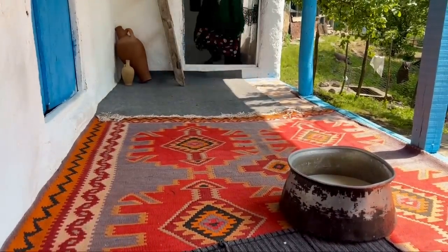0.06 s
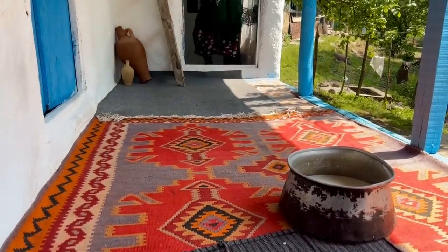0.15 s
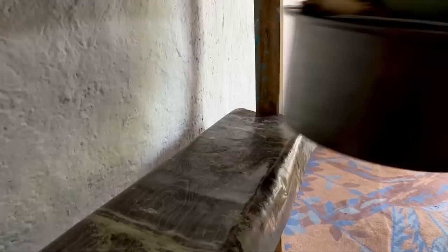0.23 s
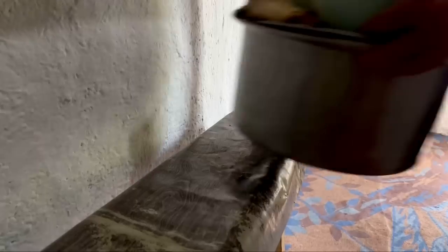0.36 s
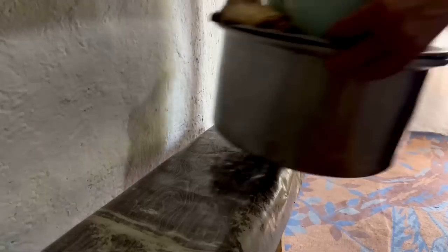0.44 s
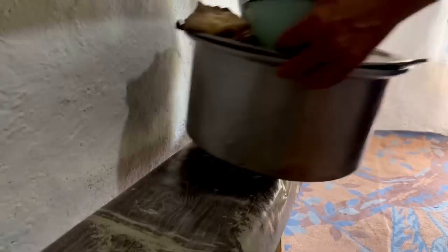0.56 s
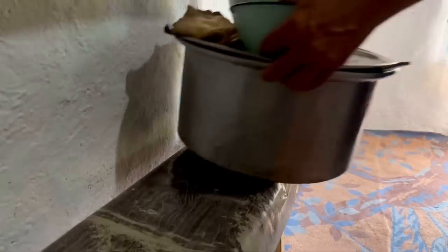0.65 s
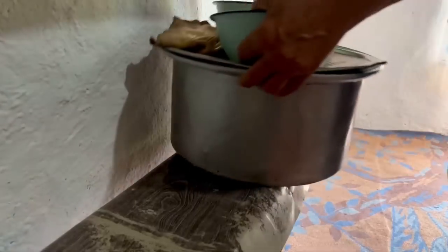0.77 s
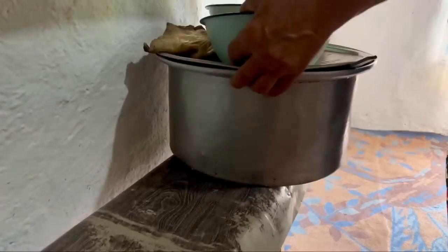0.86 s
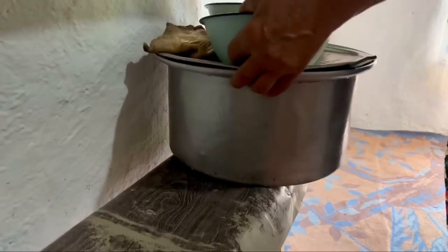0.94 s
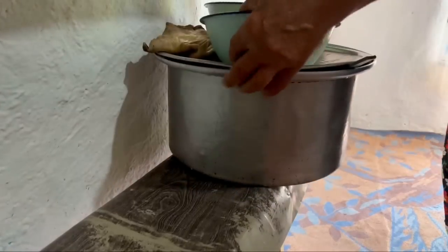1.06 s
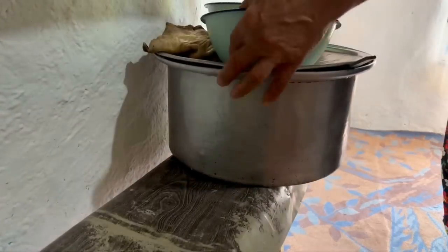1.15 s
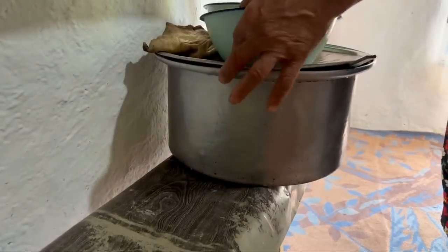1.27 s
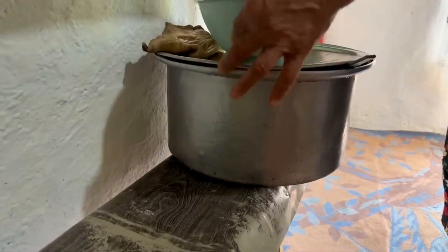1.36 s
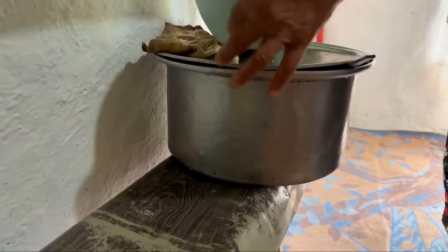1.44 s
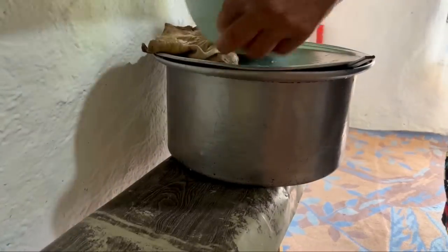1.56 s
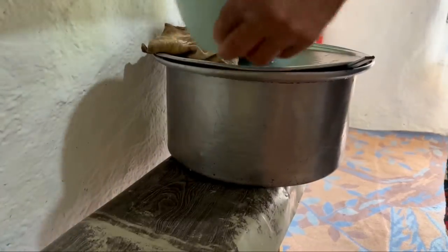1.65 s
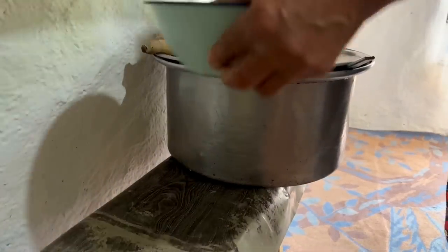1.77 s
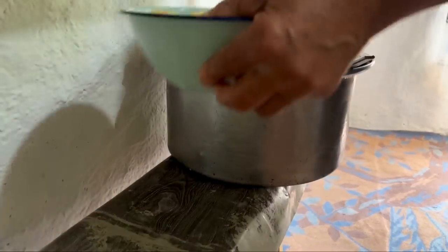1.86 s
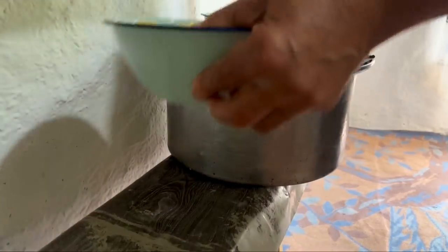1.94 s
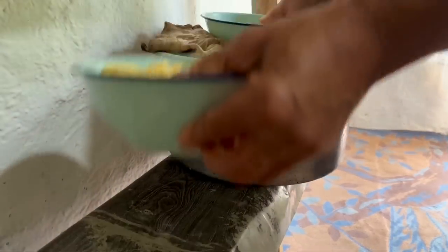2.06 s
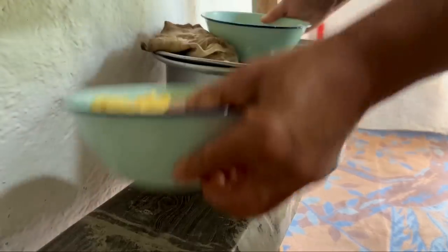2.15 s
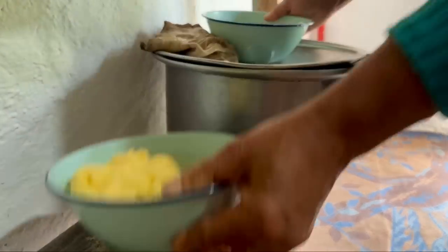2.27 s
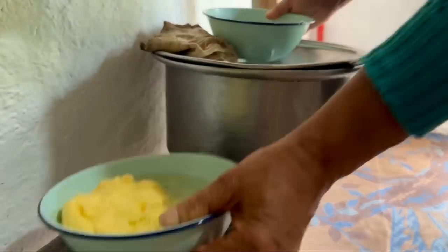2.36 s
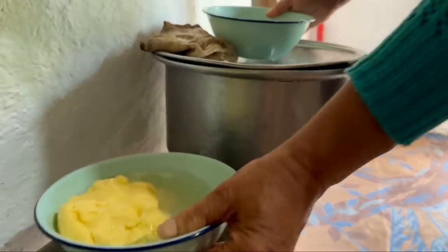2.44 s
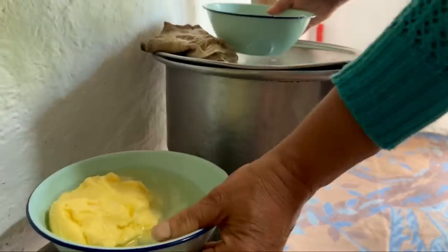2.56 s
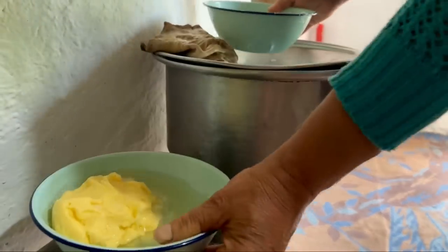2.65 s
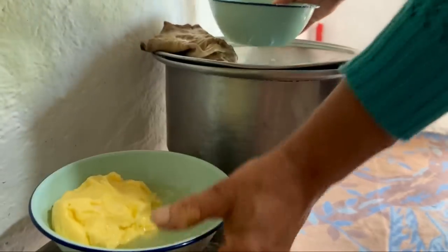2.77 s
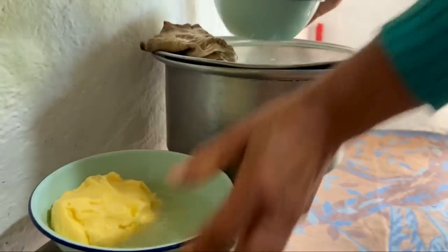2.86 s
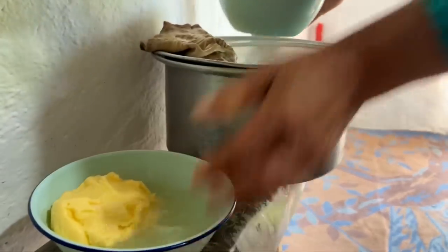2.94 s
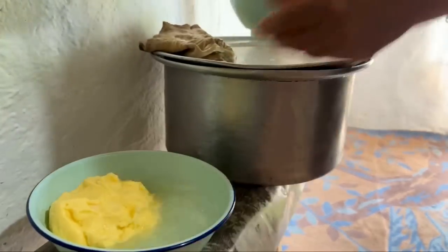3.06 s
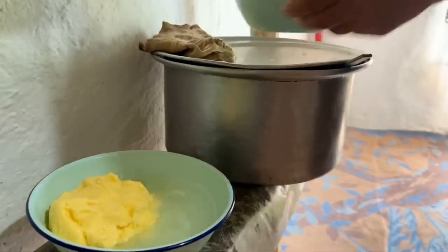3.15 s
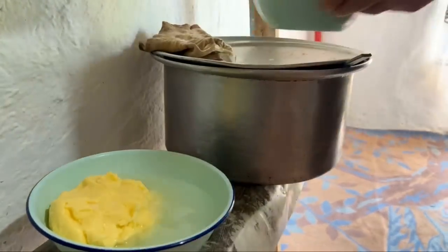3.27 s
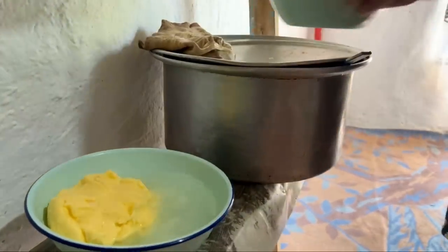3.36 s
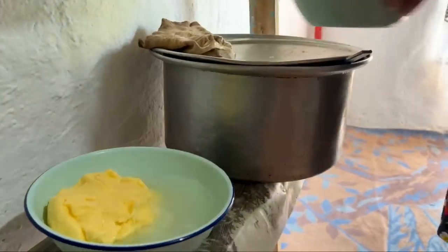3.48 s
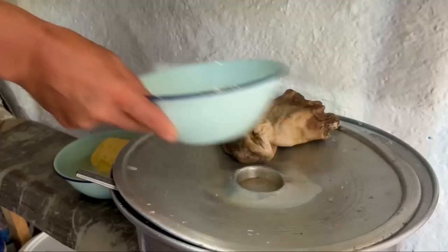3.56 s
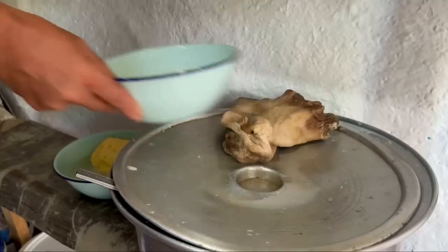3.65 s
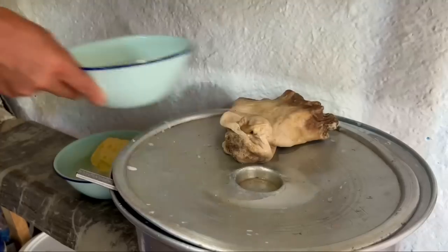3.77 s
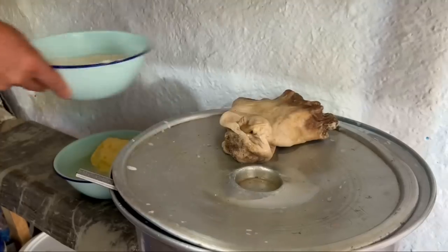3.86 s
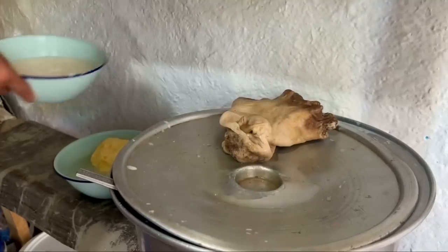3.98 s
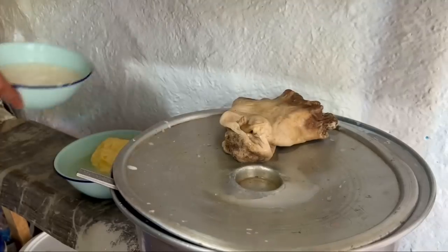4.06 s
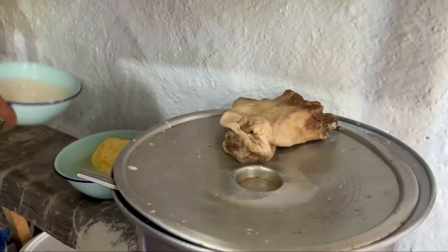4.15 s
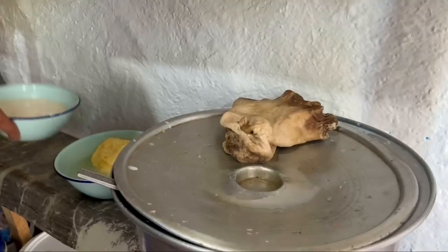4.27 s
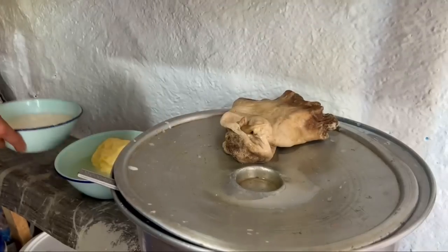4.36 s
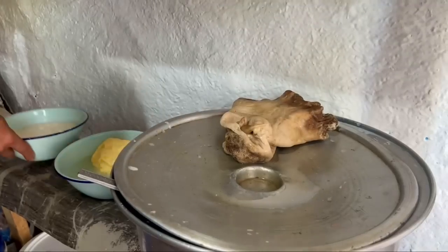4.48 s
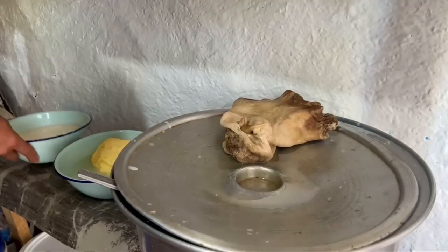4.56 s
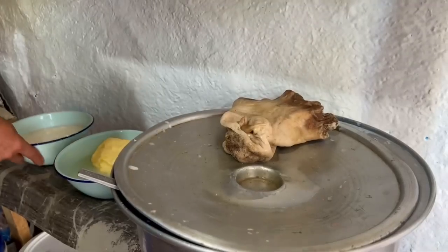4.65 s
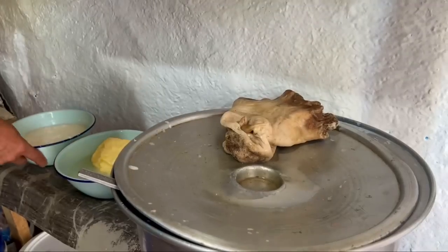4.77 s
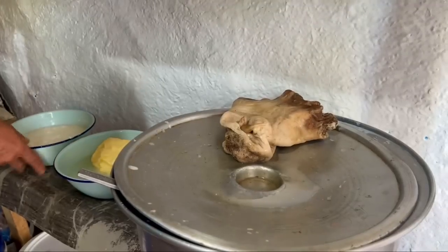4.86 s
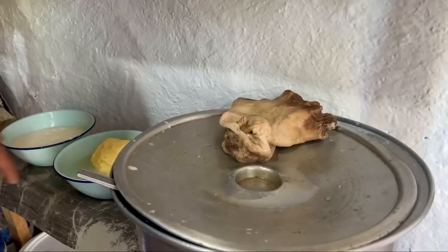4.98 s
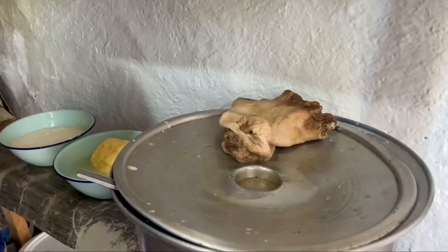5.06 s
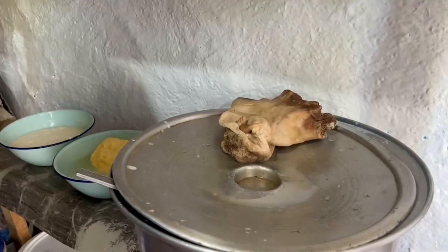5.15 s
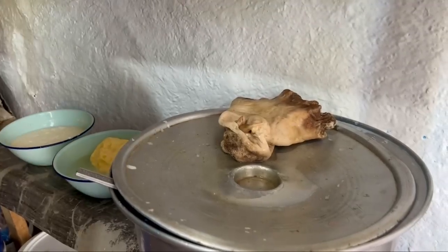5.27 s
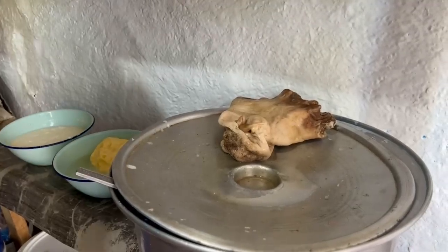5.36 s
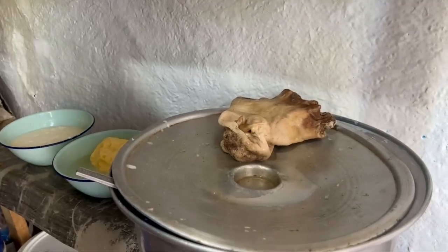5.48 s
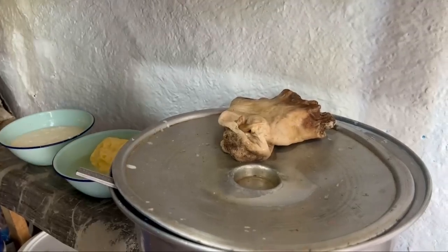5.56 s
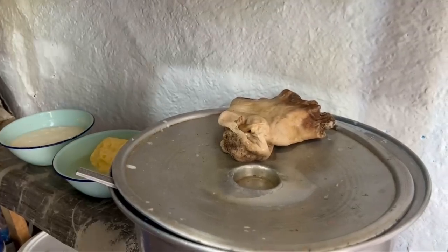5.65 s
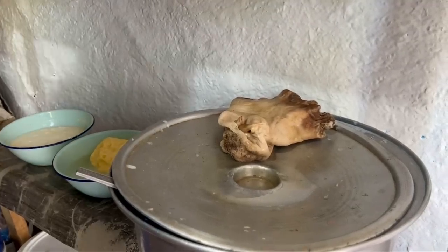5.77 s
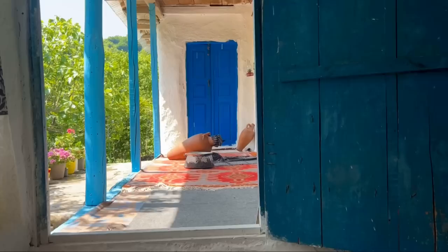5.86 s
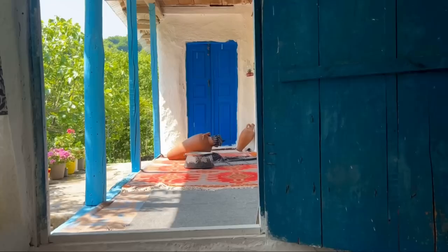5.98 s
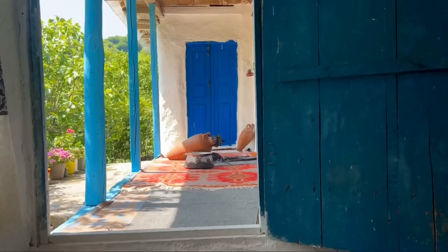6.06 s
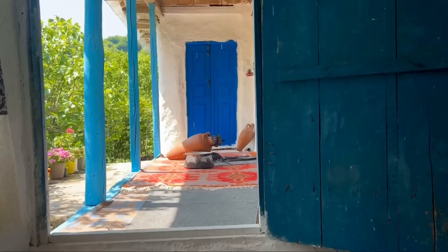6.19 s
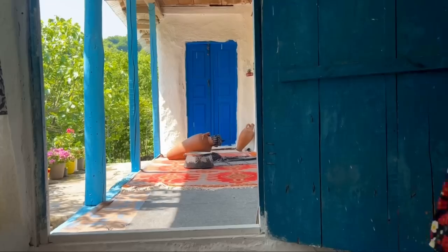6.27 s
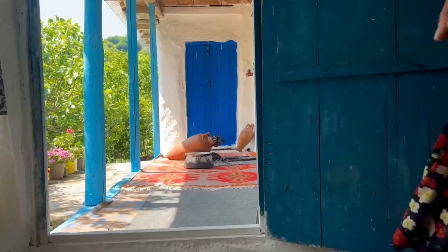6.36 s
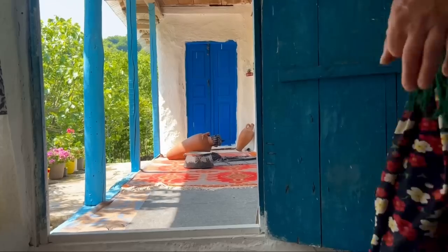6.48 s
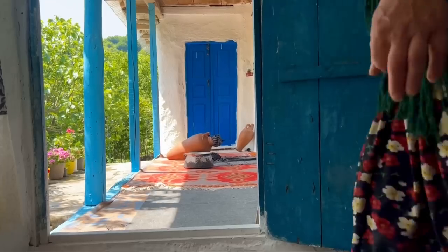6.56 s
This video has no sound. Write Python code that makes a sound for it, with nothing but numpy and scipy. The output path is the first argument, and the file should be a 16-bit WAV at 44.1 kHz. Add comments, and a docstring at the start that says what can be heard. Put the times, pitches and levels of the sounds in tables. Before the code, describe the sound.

Low room noise opens, with a brief rub at about 0.5 seconds. At 0.8 a full aluminium pot lands on a wooden bench with a dull, rattling knock. An enamel bowl clinks brightly on the lid at 1.4, then hits it at 1.7 with the loudest clank, ringing briefly. From 2.4 to 2.7 a bowl is set on the bench in a cluster of knocks with a lingering low rumble. Light rim ticks and faint hand and cloth rubs follow until about 3.7. After more rubbing, a second bowl knocks down more softly at 4.6. From 5 to 6 seconds two faint low tones swell while a slipper drags quietly twice. Everything is close and slightly left, with the short reverberation of a small plastered room. The background dips for an instant and changes level near 0.3, 3.5 and 5.9 seconds, staying quiet until the end.

```python
"""Low room noise and a brief rub come first; then a full aluminium pot is set on a wooden bench, enamel
bowls knock on its lid and are put down beside it. Each impact excites the damped normal modes of the
struck thing, rattles on briefly and reverberates in a small plastered room. Hands, cloth and a dragging
slipper make friction noise, and two faint low tones swell near the end. Rumble lingers after the knocks,
with faint rustling between; three times the sound dips for an instant and the background level steps."""
import sys
import numpy as np
from scipy import signal
from scipy.io import wavfile
from scipy.ndimage import uniform_filter1d

SR = 44100
rng = np.random.default_rng(int(sys.argv[2]) if len(sys.argv) > 2 else 0)


def put_to_file(sound):
    """Save the sound as 16-bit audio at rate SR, in the file named by the first command-line argument."""
    columns = np.atleast_2d(sound).T  # one column per channel
    safe = np.clip(columns, -1, 1)
    whole_steps = np.round(safe * 32767)
    wavfile.write(sys.argv[1], SR, whole_steps.astype(np.int16))


N = 291936

# impacts, levels relative: (time [s], thud [dB], ring [dB], crack [dB], left minus right [dB],
# rattle [dB], rattle time [s], contact noise [dB], mode pitch [ratio], ring length [ratio],
# frequency favoured by the struck spot [Hz], its gain [dB])
POT_IMPACTS = [(0.712, -44.5, -54.5, -46.5, 2.5, -3, 0.035, -1.5, 1.12, 0.76, 306, 6.5),
               (0.746, -43.5, -58, -66, 4, -1, 0.031, 7, 1.1, 1.5, 305, 2.5),
               (0.802, -46.5, -48.5, -64.5, 5, -1, 0.053, -1.5, 1.22, 0.94, 330, 1.5),
               (0.8455, -20.5, -33.5, -44.5, 4, -3.5, 0.053, -6.5, 1.01, 1.05, 232.6, 7),
               (0.876, -31.5, -42.5, -53, 7.5, -1.5, .03, 1, 0.99, 0.44, 260, -0.5),
               (0.906, -31.5, -56.5, -64.5, 3.5, -11, .03, -9, .97, 0.77, 170, 1),
               (1.107, -52, -59.5, -74, 4.5, 2.5, 0.036, -3.5, 1.01, 0.58, 2933, 1),
               (1.154, -50, -65.5, -84, 4.5, 8.5, .04, -2.5, 0.85, 3, 1969, 3)]
# modes before the extra damping and each blow's ratios: (frequency [Hz], level [dB], t60 [s])
POT_MODES = [(115.8, -12.5, 0.35), (158, -7.5, 0.29), (208, 2, 0.066), (252, 5, 0.15), (360, -8, 0.17),
             (568, -7.5, 0.15), (672, -3, 0.14), (842.7, -10, 0.08), (1166, -0.5, 0.07),
             (1300, -1.5, 0.065), (1565, -4, 0.044), (2100, -3, 0.031), (2700, -3, 0.03), (3360, -7, 0.011),
             (5346, 0.5, 0.03)]
# spectrum of a blow: (gain [dB]) per contact band
POT_COLOUR_DB = [4, 4.5, 4, 3.5, 0.9, -12]


def pot():
    """Impact excitation: meeting the bench sets the full pot's normal modes ringing."""
    return impacts(POT_IMPACTS, POT_MODES, POT_COLOUR_DB, size=SR // 5)


# the lid's impacts, modes and blow spectrum; columns as for the pot
LID_IMPACTS = [(1.238, -75, -75.5, -75, 4, 11, 0.049, -12.5, 1.005, 1.8, 5200, 14),
               (1.281, -61.5, -50, -63, 4, 2, 0.016, -17, 1.005, .8, 4996, 13),
               (1.287, -67, -51, -66, 3, 6, 0.03, -17, 1.03, 0.62, 690, 9),
               (1.3534, -29.5, -17.5, -18, 4.3, -12, 0.07, -12, 0.91, 0.95, 5200, 3),
               (1.362, -23, -27, -45, 4.6, -12, 0.04, -10, 1.002, .9, 540, 4),
               (1.6899, -12, -17, -18.5, 7.1, -2, 0.06, -6, 0.999, 0.86, 190, 5.5),
               (1.7532, -24.5, -29, -39.5, 5.4, -12.5, 0.038, 3, 0.999, 0.4, 300, 12),
               (1.775, -57.5, -35, -47.5, 9.5, 1, 0.094, 3.5, 1.003, 0.86, 1620, 3.8),
               (1.8143, -31, -40, -49, 8, -9, 0.028, 16, 1.07, 0.72, 255, 2.3)]
LID_MODES = [(117, -9.5, 0.5), (186, 1.5, 0.3), (256.5, -4, 0.14), (322, -5.5, 0.18), (434.4, -1, 0.15),
             (533, 0, 0.11), (678, 0, 0.1), (808, -3, 0.09), (1055, -7.5, 0.11), (1124, -6, 0.035),
             (1232, -8.5, 0.1), (1450, 0.5, 0.06), (1478, -19, 1.2), (1580, -5, 0.12), (1910, -3.5, 0.087),
             (2200, -7, 0.05), (2394, -2, 0.09), (2757, -5.5, 0.09), (2806, -5.5, .09), (4148, -12, .03),
             (5000, -3, 0.037), (5560, 2, .03), (6060, -3, 0.029), (6815, -9.5, .025), (7800, 1.5, .025),
             (8400, -0.5, .025), (8700, -2.5, .03), (9200, -9, .02), (12100, -1.5, .02), (11500, -2.5, .02),
             (14900, 2.5, .02)]
LID_COLOUR_DB = [1, 1.7, 2.56, -3, -2, -3.5]


def lid():
    """Plate vibration: knocked by a bowl, the lid rings in modes that reach far into the treble."""
    return impacts(LID_IMPACTS, LID_MODES, LID_COLOUR_DB, size=SR // 4)


# the bowls' impacts, modes and blow spectrum; columns as for the pot
BOWL_IMPACTS = [(2.3968, -19, -24.5, -42, 6.4, -3.5, .04, 2, 0.99, 0.58, 1031, 2.2),
                (2.425, -23.5, -43, -34, 5.3, 7.5, 0.014, -5, 1.005, 0.78, 101, 3),
                (2.438, -31, -43, -38, 11, 7.5, .04, 4, 1.005, 1, 696, 2.2),
                (2.478, -30.5, -54.5, -47, 7.8, -5, .03, -7, 1.005, 0.43, 204, 4.3),
                (2.635, -30, -43, -50, 6, -12, 0.046, -1.5, .95, 0.55, 245, 10.2),
                (2.646, -65, -49.5, -39, 5.5, 7.5, 0.029, -3, 0.83, .8, 703, 1.95),
                (2.67, -38.5, -48, -42.5, 4.7, 1.5, .03, 5.5, 1.12, 1.6, 230, 3.4),
                (4.612, -28.5, -39.5, -53, 1.8, 3, .04, 2.5, .96, 1.1, 360, 10.1),
                (4.619, -30.5, -35.5, -30, 3.3, -6.5, 0.049, -7, 1.045, 0.49, 690, 4.5),
                (4.643, -31, -44.5, -55, 2, 1, .04, -2, 0.94, 1.01, 170, 3.6),
                (4.738, -45.5, -65, -65, 2, -6, .03, 3, 1.1, 0.87, 190, 10.3)]
BOWL_MODES = [(67, -6.5, 0.3), (96, -11.5, 0.25), (166.7, -0.5, 0.48), (194.1, -0.5, 0.42),
              (261.6, 4, 0.17), (322, -7.5, 0.44), (361.6, 10, 0.068), (405.4, -3, 0.14),
              (709, -6.5, 0.079), (1070, -10.5, 0.053), (1480, -5.5, 0.024), (1830, -4.5, 0.033),
              (2090, -3, 0.027), (2665, -2, 0.05), (3745, -2.5, 0.01998), (4600, -6, 0.03),
              (5800, -14, 0.017), (6776, -20.5, .02)]
BOWL_COLOUR_DB = [2.5, 9.5, 5.5, 0.23, -8, -18]


def bowls(edge_lead_s=0.012, edge_db=-28):
    """Shell vibration, excited twice: a bowl's edge meets the bench just before its foot lands."""
    foot = impacts(BOWL_IMPACTS, BOWL_MODES, BOWL_COLOUR_DB, size=SR // 5)
    return foot + undb(edge_db) * np.roll(foot, -int(edge_lead_s * SR), axis=1)


# a rim's impacts, modes and blow spectrum; columns as for the pot
RIM_IMPACTS = [(1.5778, -56, -67.5, -58, 3.6, -11, 0.01, 3, 1, 1.01, 5043, 1),
               (2.7685, -44.5, -43.5, -52, 5, -9.5, 0.0044, -2.5, 1.04, 0.44, 2990, 2.2),
               (2.801, -71.5, -59.5, -60, 12, -11, 0.0062, 0, 1.19, .5, 3000, 1.5),
               (3.024, -75, -62, -78, 4.2, -10, .005, -15, 1.005, 1.01, 1700, 3),
               (3.2221, -74, -70, -58.5, 4.3, -25.5, 0.0044, -17, 1.01, .7, 8000, 3),
               (3.251, -80.5, -70, -70, 4, -19.5, .005, -3, 1.005, 0.93, 1700, 2),
               (3.276, -64.5, -70, -55, 2.9, -18, .008, -4, 1.16, 1.01, 7960, 3.3),
               (3.32, -76, -63, -72, 4, -18, .005, -4, 1.005, .7, 2500, 2.1),
               (3.4208, -59, -44.5, -45.5, 3.4, 1, 0.0035, -13, 1.03, 0.62, 5100, 6.6)]
RIM_MODES = [(230, 0.5, 0.036), (403, 0.5, .04), (1710, -0.5, 0.024), (2400, -5.5, 0.013),
             (3300, -12, 0.006), (5100, -1.5, 0.012), (5500, 1.5, .012), (6500, -2.5, .011),
             (7800, -3, 0.011)]
RIM_COLOUR_DB = [5, -2.5, -9, 2, -2.66, -18.5]


def rim():
    """Heavy damping: light touches on a rim die away so fast that they are heard as ticks."""
    return impacts(RIM_IMPACTS, RIM_MODES, RIM_COLOUR_DB, size=SR // 10)


# the six contact bands, thud, body, ring, clink, crack and sizzle: (edge [Hz])
BANDS_HZ = [90, 230, 600, 1300, 3500, 9000, 16000]
# one value per contact band:
BAND_POSITION = [0.076, 0.36, 1.035, 1.39, 2.4, 2.2]  # (position [0 low, 1 middle, 2 high level])
BUILD_UP_S = [0.0027, 0.0048, 0.0025, 0.0031, 0.0002, 0.0017]  # (rise time [s])
NOISE_DB = [-3.5, -3.5, -1, -2, 0, -3]  # (contact noise against the modes [dB])
NOISE_T60_S = [0.11, 0.027, 0.039, 0.021, 0.07, 0.038]  # (t60 of contact noise [s])
CLICK_DB = [-15.5, -15, -2.5, -7.5, -9.5, -7.5]  # (click of first contact against the modes [dB])
CHATTER_DB = [-12.5, -7.5, -3, 8, 2, -1]  # (rattle gain [dB]); small contacts barely move the low modes
SPREAD_RAD = [0.079, 0.27, 0.99, 0.34, 0.094, 1]  # (phase spread between the channels [rad])
BAND_PAN_DB = [-0.77, -1.34, 0, 2.18, 1.73, -8.5]  # (left minus right [dB])


def impacts(table, modes, colour_db, size, damping_t60_s=0.6, treble_cycles=110):
    """Modal superposition: each blow sums decaying modes, noise and a click; chatter repeats them."""
    out, t = np.zeros((2, N + SR)), np.arange(size) / SR
    hz, db, t60 = np.transpose(modes)[:, :, None]
    mode_band = np.clip(np.digitize(hz[:, 0], BANDS_HZ) - 1, 0, None)
    t60 = np.where(hz > 1600, np.minimum(t60, treble_cycles / hz), t60)  # the treble dies quickly
    t60 = 1 / (1 / t60 + 1 / damping_t60_s)  # an extra damping shortens every mode's ring
    impulse = 1. * (np.arange(size) == SR // 800)
    clicks = [band(impulse, BANDS_HZ[k], BANDS_HZ[k + 1]) for k in range(6)]
    for start, *levels_db, pan_db, rattle_db, rattle_s, noise_db, pitch, length, spot_hz, spot_db in table:
        pulses = chatter(rattle_db, rattle_s)
        # the struck spot moves, so the modes' share and pitch shift from blow to blow
        share, detune, phase = rng.standard_normal((3, len(hz), 1))
        angle = 2 * np.pi * hz * pitch * (1 + 0.005 * detune) * t
        phase = phase * np.take(SPREAD_RAD, mode_band)[:, None]
        rings = undb(db + 0.4 * share) * np.sin([angle + phase, angle - phase]) * fade(t, t60 * length)
        sound = 0
        for k, level_db in enumerate(six_bands(levels_db, colour_db)):
            noise = undb(NOISE_DB[k] + noise_db) * contact_noise(k, size) * fade(t, NOISE_T60_S[k])
            ring = rings[:, mode_band == k].sum(axis=1)
            part = (noise + ring / (np.abs(ring).max() + 1e-9)) * np.clip(t / BUILD_UP_S[k], 0, 1)
            part += undb(CLICK_DB[k]) * clicks[k] / np.abs(clicks[k]).max()
            part += undb(CHATTER_DB[k]) * signal.fftconvolve(part, pulses, axes=1)[:, :size]
            peak_rms = np.sqrt(uniform_filter1d(np.mean(part ** 2, axis=0), size=SR // 100).max())
            sound += undb(level_db) * pan(BAND_PAN_DB[k]) * part / peak_rms
        favoured = signal.lfilter(*signal.iirpeak(spot_hz, Q=2.5, fs=SR), sound)
        add(out, start, sound + (undb(spot_db) - 1) * favoured, pan_db)
    return out[:, :N]


def chatter(level_db, duration_s, contacts=80):
    """Rebound: tiny force pulses at random times weaken as the struck thing settles."""
    when, force = rng.random(contacts), rng.standard_normal(contacts)
    pulses = np.zeros((1, SR // 10))
    at = np.clip(when * duration_s * SR, 0, pulses.size - 1).astype(int)
    np.add.at(pulses[0], at, undb(level_db) * force * fade(when, 3.9) / 6)
    return pulses


# rubs, levels relative: (time [s], lows [dB], middle [dB], treble [dB], left minus right [dB], t60 [s])
RUBS = [(0.453, -91, -78.5, -67, 8.5, 0.22), (1.018, -51.5, -55.5, -62.5, 3, 0.3),
        (2.001, -98, -68, -90, 10, 0.13), (2.269, -67.5, -61.5, -78, 5.5, 0.13),
        (2.927, -77.5, -72, -86.5, 7, 0.14), (3.024, -71, -63, -80.5, 6, 0.19),
        (3.267, -65, -64, -69.5, 3.5, 0.36), (3.512, -66.5, -61, -79.5, 8, 0.028),
        (3.679, -64.5, -64.5, -85, 5.5, 0.24), (4.313, -80, -63.5, -58, 5, 0.13),
        (4.322, -55.5, -50, -76.5, 3, 0.42), (4.429, -62.5, -58, -81, 8, 0.16),
        (4.934, -66, -62.5, -105.5, 3.5, 0.17), (5.058, -63.5, -74, -93.5, 13.5, 0.097),
        (5.806, -64, -69.5, -82.5, 5, 0.33)]
# friction spectrum: (gain [dB]) per contact band
RUB_COLOUR_DB = [1.04, 2, -1, 1, 1.3, -14]


def rubs(rise_s=0.0033, hold_s=0.0093, grain_db=2.5):
    """Uneven friction: hands and cloth make noise whose level jumps with the grip every few ms."""
    out, t = np.zeros((2, N + SR)), np.arange(SR // 4) / SR
    for start, *levels_db, pan_db, t60 in RUBS:
        envelope = np.clip(t / rise_s, 0, 1) * fade(np.clip(t - rise_s - hold_s, 0, None), t60)
        grip = np.repeat(rng.standard_normal(len(t) // 147), 147)
        envelope *= undb(grain_db * uniform_filter1d(grip, size=60))
        bands_db = six_bands(levels_db, RUB_COLOUR_DB)
        noise = sum(undb(db) * contact_noise(k, len(t)) for k, db in enumerate(bands_db))
        add(out, start, envelope * noise, pan_db)
    return out[:, :N]


# slipper strokes: (time [s], rise [s], hold [s], fall [s], level [dB])
SLIPPER_STROKES = [(5.18, .13, 0.1, 0.1, -69), (5.544, 0.035, 0.12, 0.067, -63.5)]
# resonances of sole and floor at mid-stroke: (frequency [Hz], bandwidth [Hz], level [dB])
SOLE_RESONANCES = [(1000, 450, 0), (1450, 450, -1), (2250, 650, 3), (3200, 500, -6), (3900, 700, -2),
                   (4700, 600, -7), (5800, 2400, -10)]


def slipper(climb_per_s=0.3):
    """Source and filter: friction noise fills flickering resonances that climb as a stroke presses on."""
    out = np.zeros((2, N))
    for start, rise, hold, fall, db in SLIPPER_STROKES:
        rub = sum(undb(gain_db + 3.5 * walk(16)[:SR]) * pair(0.17, hz - width / 2, hz + width / 2, SR)
                  for hz, width, gain_db in SOLE_RESONANCES)
        since = np.arange(N) / SR - start - rise - hold / 2
        read_at = (since + climb_per_s * since ** 2 / 2 + .5) * SR  # ever faster, so the pitch bends up
        stroke = np.array([np.interp(read_at, np.arange(SR), side) for side in rub / rub.std()])
        out += undb(db) * swell(start, rise, hold, fall) * stroke
    return out


# room decay: (frequency [Hz], t60 [s], level against the direct sound [dB], left-right coherence [0-1])
ROOM_DECAY = [(109, 0.45, -11.5, 0.7), (306, 0.28, -12.5, 0.9), (1060, 0.13, -0.5, 0),
              (3300, 0.13, -6.5, 0.2), (9100, 0.086, -13.5, 0.3), (13480, 0.11, -12, 0.03)]


def room(x, late_db=-21, late_db_per_band=-8, late_t60_s=0.6):
    """Reverberation: dense echoes build up and decay band by band; a weak, slow tail holds the lows."""
    t, response = np.arange(SR // 2) / SR, 0
    hz = np.array(ROOM_DECAY)[:, 0]
    edges = np.r_[40, np.sqrt(hz[1:] * hz[:-1]), 17000]
    for k, (_, t60, db, coherence) in enumerate(ROOM_DECAY):
        decay = fade(t, t60) + undb(late_db + k * late_db_per_band) * fade(t, late_t60_s)
        tail = pair(coherence, edges[k], edges[k + 1], len(t)) * decay * np.clip(t / 0.017, 0, 1)
        band_share = (edges[k + 1] - edges[k]) / (SR / 2)
        energy = np.mean(np.sum(tail ** 2, axis=1))
        response += undb(db) * tail * np.sqrt(band_share / energy)
    return signal.fftconvolve(x.mean(axis=0)[None], response, axes=1)[:, :N]


# swells: (tone [0 lower, 1 upper], time [s], hold [s], fall [s], level [dB])
HUM_SWELLS = [(0, 4.92, 0.12, 0.095, -58.5), (0, 5.3, 0.22, 0.35, -56.5), (1, 4.94, .1, .25, -62.5),
              (1, 5.2, 0.538, .08, -68)]


def hum(tones_hz=(124, 380), waver_hz=(8, 16), rise_s=0.038):
    """Random modulation: two low tones waver in pitch and level as they swell and fade."""
    out = 0
    for k, (hz, waver) in enumerate(zip(tones_hz, waver_hz)):
        gain = sum(undb(db) * swell(start, rise_s, hold, fall)
                   for tone, start, hold, fall, db in HUM_SWELLS if tone == k)
        gain *= undb(2 * walk(29))
        phase = 2 * np.pi * np.cumsum(hz + waver * walk(30)) / SR
        out += gain * np.sqrt(2) * np.sin(phase)
    return out


# low thump and rumble lingering after the knocks, with faint rustling between them:
# (time [s], lows [dB], treble [dB])
BACKGROUND_LEVELS = [(0, -54.5, -98), (.2, -94, -92), (0.751, -78, -88), (.92, -55, -70.5),
                     (1.199, -59.5, -76.5), (1.319, -54.5, -62), (1.5, -64.5, -81), (1.66, -58.5, -66),
                     (1.901, -60, -69.5), (2.1, -70.5, -81.5), (2.38, -65.5, -75), (2.451, -37.5, -51),
                     (2.62, -59, -74.5), (2.68, -45, -63), (3.0, -78, -101), (3.5, -70, -74),
                     (3.8, -70.5, -96.5), (4.5, -69, -77.5), (4.799, -60, -82.5), (5.1, -57.5, -79.5),
                     (5.5, -61.5, -80), (5.86, -69.5, -82.5), (5.9, -87.5, -91.5), (6.45, -79.5, -90.5),
                     (6.62, -65, -79)]
# its four bands, rumble, body, rustle and hiss:
BACKGROUND_EDGES_HZ = [38, 100, 520, 2300, 9500]  # (edge [Hz])
BACKGROUND_COHERENCE = [1, 0.74, 0.63, 0.98]  # (left-right coherence [0-1])
BACKGROUND_COLOUR_DB = [1, -6, 2, -11.5]  # (gain [dB]); two on the lows, two on the treble
# room tone: (time [s], rumble [dB], body [dB], rustle [dB], hiss [dB], left minus right [dB])
ROOM_TONE_STEPS = [(0, -58.5, -68, -73.5, -77, 3.5), (0.251, -69.5, -74, -81.5, -88.5, 3),
                   (3.546, -69.5, -86, -82, -85.5, 2.9), (5.884, -75, -74, -77, -80, 4.1)]


def rumble_and_rustle(air_db=-103):
    """Incoherent addition: swelling noise and room tone sum in power, each band flickering alone."""
    t, out = np.arange(N) / SR, undb(air_db) * pair(.3, 9500, 21000)
    levels, steps = np.array(BACKGROUND_LEVELS), np.array(ROOM_TONE_STEPS)
    step = np.digitize(t, steps[:, 0]) - 1
    for k, coherence in enumerate(BACKGROUND_COHERENCE):
        contour = undb(np.interp(t, levels[:, 0], levels[:, 1 + k // 2]) + BACKGROUND_COLOUR_DB[k])
        gain = np.hypot(contour, undb(steps[step, k + 1])) * undb(0.71 * walk(20))
        out += gain * pair(coherence, BACKGROUND_EDGES_HZ[k], BACKGROUND_EDGES_HZ[k + 1])
    return out * pan(steps[step, -1])


def dips(drop_s=0.00072, recovery_s=0.0042):
    """Amplitude modulation: a gain that drops and quickly recovers at each step of the room tone."""
    t, db = np.arange(N) / SR, 0
    for start, *_ in ROOM_TONE_STEPS[1:]:
        since = np.clip(t - start, 0, None)
        db -= 68 * np.minimum(since / drop_s, 1) * np.exp(-since / recovery_s)
    return undb(db)


def undb(db):
    """Amplitude ratio of a level in dB."""
    return 10 ** (np.asarray(db) / 20)


def band(x, lo_hz, hi_hz, order=2):
    """Causal band-pass filtering along the last axis."""
    return signal.sosfilt(signal.butter(order, [lo_hz, hi_hz], "band", fs=SR, output="sos"), x)


def pair(coherence, lo_hz, hi_hz, size=N):
    """Partial coherence: left and right band noise of rms 1 share a part of their motion."""
    mid, side = band(rng.standard_normal((2, size)), lo_hz, hi_hz, order=3)
    both = np.sqrt(1 + coherence) * mid + np.sqrt(1 - coherence) * side * np.array([[1], [-1]])
    return both / both.std()


def contact_noise(k, size):
    """Noise in contact band k; phase spread lowers its left-right coherence."""
    return pair(np.cos(SPREAD_RAD[k]), BANDS_HZ[k], BANDS_HZ[k + 1], size)


def six_bands(levels_db, colour_db):
    """Spectral envelope: six band levels interpolated from a low, middle and high level."""
    return np.interp(BAND_POSITION, np.arange(3), levels_db) + colour_db


def fade(t, t60):
    """Exponential decay, 60 dB down after t60."""
    return np.exp(-np.log(1000) * t / t60)


def swell(start, rise, hold, fall):
    """Trapezoidal envelope, times in seconds."""
    return np.interp(np.arange(N) / SR, np.cumsum([start, rise, hold, fall]), [0, 1, 1, 0])


def walk(rate_hz):
    """Slow fluctuation: straight glides between random values of unit spread."""
    hold = int(SR / rate_hz)
    return uniform_filter1d(np.repeat(rng.standard_normal(N // hold + 1), hold), hold)[:N]


def pan(db):
    """Level difference: left and right gains that lie db apart."""
    return undb(db * np.array([[.5], [-.5]]))


def add(out, start_s, sound, pan_db):
    """Superpose a sound at its time and side."""
    i = int(start_s * SR)
    out[:, i:i + sound.shape[1]] += sound * pan(pan_db)


def scene():
    """Superposition: impacts and rubs, their reverberation and the background, all under the dips."""
    direct = undb(-3.0) * (bowls() + pot() + lid() + rim() + rubs())
    return (direct + room(direct) + rumble_and_rustle() + hum() + slipper()) * dips()


def record(dry, bass_hz=42, top_hz=16300):
    """Band limiting and soft saturation, with the right channel one sample late."""
    heard = np.array([dry[0], np.r_[0, dry[1, :-1]]])
    heard = signal.sosfilt(signal.butter(3, bass_hz, "high", fs=SR, output="sos"), heard)
    heard = .95 * np.tanh(heard / .95)
    return signal.sosfilt(signal.ellip(10, .2, 90, top_hz, fs=SR, output="sos"), heard)


dry = scene()
out = record(dry)
put_to_file(out)
```